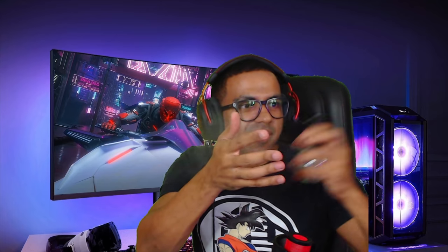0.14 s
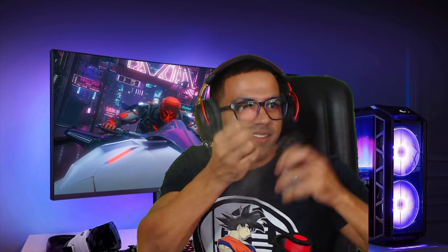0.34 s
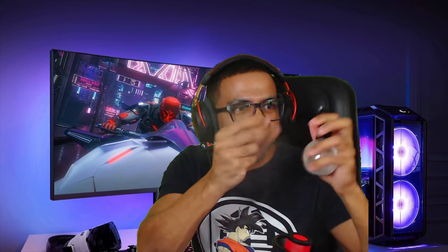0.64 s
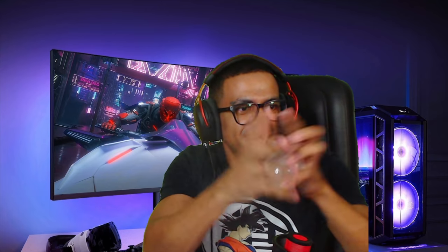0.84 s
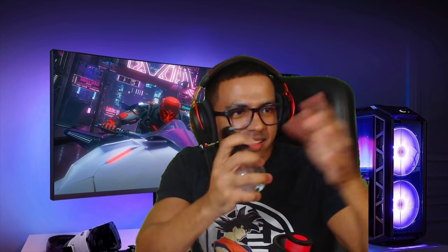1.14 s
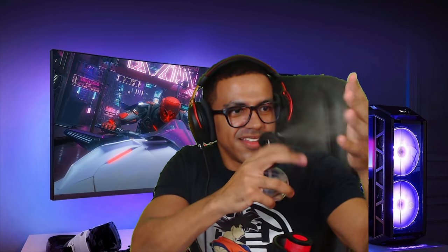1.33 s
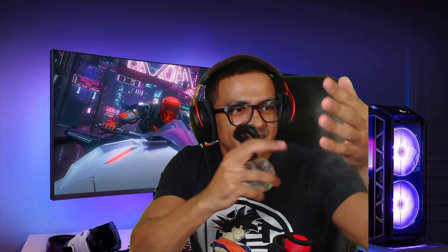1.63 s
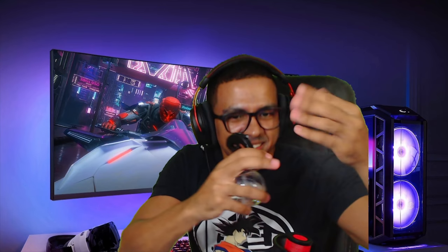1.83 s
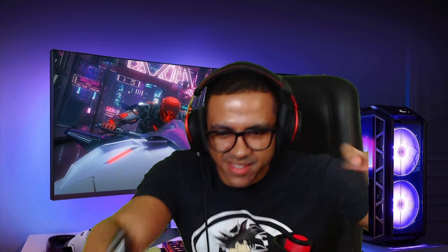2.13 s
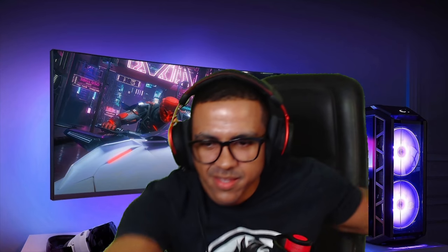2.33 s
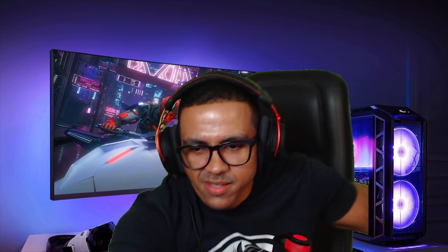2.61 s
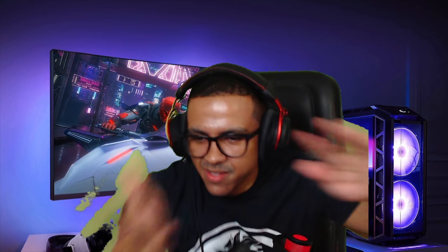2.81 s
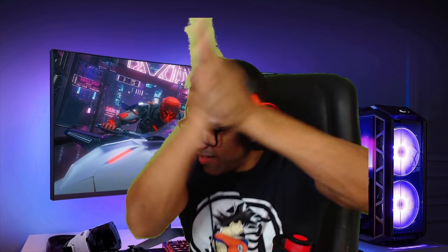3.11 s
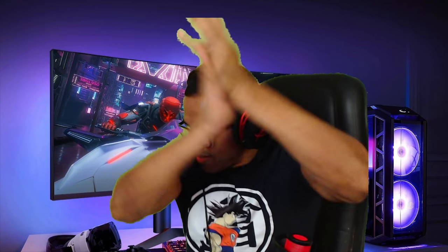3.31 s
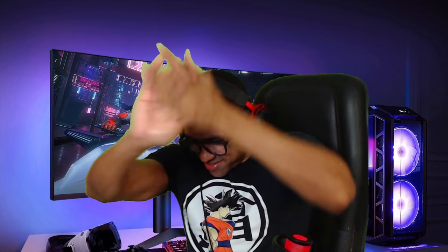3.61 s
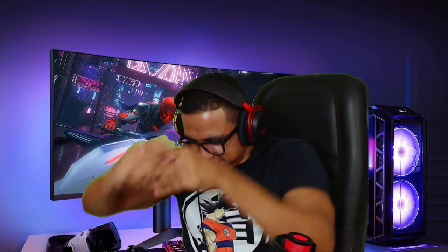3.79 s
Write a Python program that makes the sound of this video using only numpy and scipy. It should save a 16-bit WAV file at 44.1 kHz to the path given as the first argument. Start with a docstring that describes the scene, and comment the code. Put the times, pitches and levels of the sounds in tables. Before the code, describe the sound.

Spray bottle squirts and sharp plastic clicks come first, in two groups; after a short scrape the bottle lands hard on the desk, then hands clap lightly and rub in soft strokes, close microphone, small dry room.

```python
"""Pump bottle sprays and hand rub at a desk

Close by, a pump bottle sprays one hand three times and the other four (pressure-shaped hiss), its plunger clicking.
The bottle lands hard: damped desk modes boom, decaying noise rattles and shudders.
Palms meet and rub (stroke-shaped noise); arms and chair rumble faintly in a dry room."""
import sys
import numpy as np
from scipy import signal
from scipy.fft import rfft, irfft, next_fast_len
from scipy.io import wavfile
from scipy.ndimage import map_coordinates

SR = 44100
rng = np.random.default_rng(int(sys.argv[2]) if len(sys.argv) > 2 else 0)


def put_to_file(sound):
    """Save the sound as 16-bit audio at rate SR, in the file named by the first command-line argument."""
    columns = np.atleast_2d(sound).T  # one column per channel
    safe = np.clip(columns, -1, 1)
    whole_steps = np.round(safe * 32767)
    wavfile.write(sys.argv[1], SR, whole_steps.astype(np.int16))


N = 174195

# pump squirts: start_s, hold_s, level_db, treble_gain_db
SPRAYS = [(0.139, 0.12, -35, -4), (0.377, 0.1, -33.5, -2.3), (0.635, 0.1, -35, -1),
          (1.294, 0.11, -36, -5.5), (1.488, .108, -38, 2), (1.671, 0.081, -39, 2.5), (1.823, 0.08, -36, -3)]
# spray hiss spectrum: freq_hz, level_db
MIST_SPECTRUM = [(300, -46), (600, -36), (1000, -17.5), (1800, -18.5), (2500, -8), (3300, -6), (4600, -2),
                 (6000, -3.5), (7000, -5), (8200, 4.5), (9500, -0.5), (11000, -5), (13000, -11),
                 (15500, -17)]
SPRAY_START_DB, SPRAY_RISE_S, SPRAY_FALL_DB_PER_S = -6.5, 0.018, 425
SPRAY_TAIL_DB, SPRAY_TAIL_DB_PER_S = -10, 108
TREBLE_PRESSURE_EXPONENT = 1.71

# liquid spitting in the nozzle and under the fingers: start_s, end_s, level_db
SQUELCHES = [(0.148, .24, -38), (0.388, .51, -37), (0.641, 0.705, -35.5), (0.81, 0.953, -59),
             (1.019, 1.192, -45), (1.504, 1.55, -40), (1.675, 1.72, -36.5)]
DROPS_PER_S, DROP_HZ, DROP_LOG_SPREAD, DROP_T60_CYCLES = 130, 2480, 0.33, 16.7

# plunger and cap clicks: start_s, snap_db, knock_db, ring_hz (layer trims below add to the levels)
CLICKS = [(0.0353, -33.5, -34.5, 920), (0.0642, -34, -32, 2800), (.132, -30.5, -37.5, 3230),
          (0.1474, -36, -33, 2870), (0.2925, -35, -34, 1010), (.366, -31, -35, 3440),
          (.502, -32.5, -47, 4860), (0.5257, -34, -28.5, 1355), (.546, -34, -50, 1180),
          (.557, -39, -38.5, 1300), (0.6175, -34, -36, 4720), (.6376, -39, -34, 1710),
          (.771, -40, -51, 3820), (0.7845, -29, -33, 1023), (0.8043, -55, -49.5, 1390),
          (.82, -40.5, -52, 4800), (0.873, -42.5, -42, 1150), (.923, -40.5, -59, 3070),
          (1.004, -31, -36, 2320), (1.075, -47, -46.5, 1780), (1.118, -43, -57, 3000),
          (1.178, -44, -52, 2830), (1.3302, -42, -42, 1920), (1.443, -24.5, -35.5, 4460),
          (1.461, -32, -37.5, 1800), (1.482, -34, -49, 4100), (1.51, -36, -37, 934),
          (1.533, -27, -39, 4120), (1.6269, -23, -31, 4620), (1.6671, -22.5, -34.5, 4490),
          (1.6912, -35, -39.5, 990), (1.7846, -34, -35.5, 4870), (1.8192, -28, -35, 4750),
          (1.9414, -27.5, -34, 4600), (1.959, -41, -42, 2060), (1.969, -37.5, -47, 3820),
          (2.1211, -37.5, -64, 3020), (2.1605, -44.5, -58, 4350), (2.194, -61, -49, 3700)]
# hollow knock spectrum: freq_hz, level_db
KNOCK_SPECTRUM = [(200, -3), (550, -15), (950, 4), (1250, -11), (1900, -2), (2500, -2.5), (3500, -7),
                  (7000, -37)]
# plastic snap spectrum: freq_hz, level_db
SNAP_SPECTRUM = [(800, -56), (2200, -5), (3400, 2.5), (4700, 5.5), (6000, -2), (8200, 6.5), (9800, -4.5),
                 (11500, -19.5), (15500, -50)]
KNOCK_TRIM_DB, SNAP_TRIM_DB, RING_TRIM_DB = 1.5, 0.5, 4  # ring is relative to knock_db
CLICK_HOLD_S, KNOCK_T60_S, SNAP_T60_S, RING_T60_S = 0.0015, 0.019, 0.014, 0.016

# fingers shifting on the bottle: middle_s, half_length_s, level_db, top_hiss_db
GRIPS = [(.01, 0.012, -49, -50), (.07, 0.031, -55, -63), (.56, 0.062, -60, -58), (.83, 0.061, -53.5, -53),
         (.93, 0.052, -58, -57.5), (1.085, 0.03, -51, -53), (1.16, 0.035, -56.5, -55),
         (1.98, 0.036, -57.5, -61), (2.06, 0.018, -69.5, -61), (2.145, 0.026, -55.5, -67),
         (2.26, 0.088, -58, -68), (2.445, 0.017, -58.5, -65)]
# finger friction spectrum: freq_hz, level_db
GRIP_SPECTRUM = [(300, -20), (900, -16.5), (2000, 0), (4500, 0.5), (6000, -6), (9000, -26), (15500, -47.5)]
# dry top hiss spectrum: freq_hz, level_db
GRIP_TOP_SPECTRUM = [(3000, -28), (6000, -8), (8500, 7), (10500, -10), (15500, -24.5)]
# palm strokes: middle_s, half_length_s, level_db, catch_db
STROKES = [(3.106, 0.019, -46.5, -65), (3.211, 0.023, -53.5, -54.5), (3.264, 0.021, -49.5, -52),
           (3.378, 0.022, -43, -49), (3.489, 0.028, -47, -78), (3.636, 0.038, -52.5, -59),
           (3.716, 0.043, -53, -71), (3.925, 0.011, -50.5, -57.5), (3.948, 0.0045, -35, -44)]
# skin hiss spectrum: freq_hz, level_db
SKIN_SPECTRUM = [(300, -17), (900, -2.5), (1600, -24), (2800, -5), (4500, 3.5), (6500, -1), (8500, 2.5),
                 (11000, -6), (15500, -23)]
# skin catching spectrum: freq_hz, level_db
CATCH_SPECTRUM = [(500, -23), (1300, -10), (2000, -3.5), (3000, 2), (4500, -6), (8000, -18), (15500, -35)]
GRIP_ROUGH_DB, SKIN_ROUGH_DB, CATCH_ROUGH_DB = 5, 1.5, 5.5
# palms meeting: start_s, level_db
CLAPS = [(3.064, -46.5), (3.074, -26.5)]
# palm contact spectrum: freq_hz, level_db
CLAP_SPECTRUM = [(200, -5), (480, 5.5), (800, -8.5), (1300, -5), (1800, 5.5), (2600, -4.5), (4000, -6),
                 (6500, -9.5), (8500, -6.5), (11000, -17), (15500, -37.5)]
CLAP_HOLD_S, CLAP_T60_S = 0.0044, 0.024

# scrape spectrum: freq_hz, level_db
SLIDE_SPECTRUM = [(290, -24), (500, -7), (949, -25), (1720, -6.5), (2020, -15), (3090, -3), (4800, -5.5),
                  (8490, -20), (15000, -59)]
SLIDE_S, SLIDE_END_S, SLIDE_DB = 2.52, 2.605, -40.5

# bottle contacts with the desk: start_s, boom_db, clack_db, softness_corner_hz
BLOWS = [(2.607, -28, -14, 1200), (2.615, -10.5, -17.5, 900), (2.623, -27, -21, 900),
         (2.638, -13.5, -29, 650), (2.657, -13, -34, 258), (2.703, -23, -46.5, 350), (2.79, -35, -43, 600),
         (2.849, -43, -46.5, 618)]
# desk modes: freq_hz, level_db, t60_s
DESK_MODES = [(62.4, -27, 0.35), (169, -18, .13), (206, 2.5, 0.15), (269.5, -1.5, 0.099), (314, -7, 0.076),
              (327, -8, .07), (417, -5, 0.055), (441.3, -3, 0.11), (507.4, -5.5, .09), (556, -11, 0.25),
              (613, -10, 0.083), (700, -13, 0.077), (862, -19, 0.12)]
# clack spectrum: freq_hz, level_db
CLACK_SPECTRUM = [(40, -28), (150, -5), (500, 5.5), (900, -3), (1400, -14.5), (1800, -9.5), (2150, 4),
                  (2480, -2), (2900, -13), (4500, -14.5), (7000, -16.5), (9000, -18), (15500, -42)]
CLACK_HOLD_S, CLACK_T60_S = 0.0017, 0.05
# loose things rattling, spectrum: freq_hz, level_db
RATTLE_SPECTRUM = [(400, 7.5), (1200, 0.5), (2400, 3), (4500, 0), (8000, -7), (11000, -21), (15500, -36.5)]
RATTLE_DB, RATTLE_DB_PER_S = -30.5, 81
RATTLE_HOLD_S, RATTLE_EXTRA_DB_PER_S = 0.13, 114.5  # steeper fall after the hold
# desk shudder spectrum: freq_hz, level_db
SHUDDER_SPECTRUM = [(90, -30), (160, -9), (210, 5.5), (255, 1), (330, -11), (490, -7.5), (570, -8.5),
                    (680, -24.5), (850, -20.5), (1300, -43), (3000, -70)]
SHUDDER_DB, SHUDDER_DB_PER_S = -28, 45

# rumble of moving arms and chair: time_s, level_db
MOVING = [(0, -53), (.5, -49), (.9, -50.5), (1.13, -44.5), (1.26, -57.5), (1.45, -46.5), (1.75, -50),
          (2.1, -48.5), (2.3, -46), (2.6, -44), (3.15, -45), (3.25, -47), (3.5, -48.5), (3.95, -50)]
# rumble spectrum: freq_hz, level_db
RUMBLE_SPECTRUM = [(20, -28), (40, -3), (62, 10), (85, 2.5), (150, 7), (200, 1), (270, -10.5), (400, -20.5),
                   (800, -26), (2000, -54.5)]
RUMBLE_SWING_DB = 2.5
# soft bumps of hands and elbows; the rows at 2.8 and 2.855 s are the bottle rocking on the desk: start_s,
# pitch_hz, level_db, t60_s
BUMPS = [(1.006, 83, -12.5, 0.037), (1.096, 66, -33, 0.15), (1.44, 137, -26.5, 0.071),
         (1.497, 121, -27.5, 0.069), (1.688, 105, -24, 0.05), (2.026, 62.6, -32.5, .13),
         (2.48, 173, -30, 0.093), (2.8, 243, -24, 0.065), (2.855, 217, -32, 0.55), (2.925, 245, -35.5, .2),
         (2.969, 68, -35, 0.74), (3.073, 148, -28.5, 0.15), (3.302, 185.6, -26.5, 0.092),
         (3.308, 305, -33, 0.067), (3.556, 169, -32, .13), (3.579, 175, -34, 0.12)]
BUMP_RISE_S = 0.0028
# chair creak: middle_s, pitch_hz, level_db, half_length_s
CREAKS = [(3.813, 444, -54.5, 0.07)]

# steady background spectrum: freq_hz, level_db
FLOOR_SPECTRUM = [(100, 11), (500, 3), (1500, 3), (4000, -9), (9000, -41), (15500, -42)]
FLOOR_DB = -61
# room decay: freq_hz, t60_s
ROOM_DECAY = [(100, 0.2), (1000, 0.32), (5000, 0.15), (14000, .12)]
ROOM_DB = -14.5

# all-pass corners of the side signal: corner_hz
SIDE_TURNS_HZ = (60, 250, 900)
SIDE_DB, SIDE_DELAY_S = -17, 0.00044
LOW_CUT_HZ, TOP_HZ = 32, 15850


def amp(db):
    """Decibels to gain."""
    return 10 ** (np.asarray(db) / 20)


def unit(x):
    """Scale to rms 1."""
    return x / np.sqrt(np.mean(x ** 2) + 1e-20)


def along(points, hz):
    """Interpolate (freq_hz, value) points on a log frequency axis."""
    point_hz, values = np.transpose(points)
    return np.interp(np.log(hz + 1), np.log(point_hz + 1), values)


def clock():
    """Time of every sample, s."""
    return np.arange(N) / SR


def filtered(x, response):
    """Apply a frequency response by zero-padded FFT."""
    size = next_fast_len(N + 8192)
    return irfft(rfft(x, size) * response(np.fft.rfftfreq(size, 1 / SR)), size)[..., :N]


def noise(spectrum):
    """Coloured Gaussian noise of rms 1."""
    return unit(filtered(rng.standard_normal(N), lambda hz: amp(along(spectrum, hz))))


def wobble(knots_per_s):
    """Smooth curve through random normal knots."""
    knots = rng.standard_normal(int(N * knots_per_s / SR) + 4)
    return map_coordinates(knots, [np.arange(N) * knots_per_s / SR])


def add(out, start_s, x):
    """Mix x into out at start_s."""
    part = out[max(round(start_s * SR), 0):][:len(x)]
    part += x[:len(part)]


def bursts(rows, spectrum, hold_s, t60_s):
    """Short contacts (start_s, level_db): coloured noise held briefly, then decaying fast."""
    out, source, t = np.zeros(N), noise(spectrum), np.arange(4096) / SR
    shape = amp(-60 * np.maximum(t - hold_s, 0) / t60_s) * (1 - np.exp(-t / 0.0006))
    for k, (start_s, db) in enumerate(rows):
        burst = source[k * len(t):][:len(t)] * shape
        equal_energy = np.linalg.norm(shape) / np.linalg.norm(burst)
        add(out, start_s, amp(db) * burst * equal_energy)
    return out


def damped_tones(rows, rise_s, length):
    """Exponentially damped sines (start_s, pitch_hz, level_db, t60_s)."""
    out, t = np.zeros(N), np.arange(length) / SR
    for start_s, hz, db, t60_s in rows:
        decay = amp(db - 60 * t / t60_s)
        add(out, start_s, decay * np.sin(2 * np.pi * hz * t) * (1 - np.exp(-t / rise_s)))
    return out


def pings(rows):
    """Brief damped rings with a sharp onset."""
    return damped_tones(rows, 0.00028, 2048)


def sprays():
    """Pressure builds, holds and collapses; the hiss grows louder and brighter with it."""
    out, t = np.zeros(N), np.arange(SR // 2) / SR
    mist = noise(MIST_SPECTRUM)
    top = filtered(mist, lambda hz: 1 / (1 + (6000 / (hz + 1)) ** 4))
    body = mist - top
    for start_s, hold_s, db, treble_db in SPRAYS:
        late = np.maximum(t - hold_s, 0)
        push = amp(SPRAY_START_DB * np.exp(-t / SPRAY_RISE_S) - SPRAY_FALL_DB_PER_S * late)
        tail = amp(SPRAY_TAIL_DB - SPRAY_TAIL_DB_PER_S * late)
        pressure = np.maximum(push, tail) * (1 - np.exp(-t / 0.009))
        i = round(start_s * SR) + np.arange(len(t))
        bright = amp(treble_db) * top[i] * pressure ** TREBLE_PRESSURE_EXPONENT
        add(out, start_s, amp(db) * (body[i] * pressure + bright))
    return out * amp(1.1 * wobble(120))


def squelches(count=40):
    """Tiny bubbles ring at random pitches, shorter the higher."""
    drops = []
    for start_s, end_s, db in SQUELCHES:
        times = start_s + (np.arange(count) + rng.uniform(-0.86, 1, count)) / DROPS_PER_S
        pitches = DROP_HZ * np.exp(DROP_LOG_SPREAD * rng.standard_normal(count))
        levels = db + 4 * rng.standard_normal(count)
        for s, hz, level in zip(times, pitches, levels):
            if s < end_s:
                drops.append((s, hz, level, DROP_T60_CYCLES / hz))
    return pings(drops)


def clicks():
    """The plunger hits its stops: a hollow knock, a plastic snap and a ring that changes with the grip."""
    knock_rows = [(s, db + KNOCK_TRIM_DB) for s, _, db, _ in CLICKS]
    snap_rows = [(s, db + SNAP_TRIM_DB) for s, db, _, _ in CLICKS]
    rings = pings([(s, hz, db + RING_TRIM_DB, RING_T60_S) for s, _, db, hz in CLICKS])
    knocks = bursts(knock_rows, KNOCK_SPECTRUM, CLICK_HOLD_S, KNOCK_T60_S)
    snaps = bursts(snap_rows, SNAP_SPECTRUM, CLICK_HOLD_S, SNAP_T60_S)
    return knocks + snaps + rings


def friction(rows, spectrum, rough_db):
    """Sliding skin: noise swells and fades with stroke speed, with a fine grain."""
    t = clock()
    power = sum(amp(2 * db) / (1 + ((t - s) / half_s) ** 2 / 5) ** 6 for s, half_s, db in rows)
    grain = amp(rough_db * wobble(760) + rough_db / 2 * wobble(90))
    return np.sqrt(power) * unit(noise(spectrum) * grain)


def rubbing(rows, first, second, first_rough_db, second_rough_db):
    """Two friction layers on the same strokes, each at its own level."""
    first_rows = [(s, half_s, db) for s, half_s, db, _ in rows]
    second_rows = [(s, half_s, db) for s, half_s, _, db in rows]
    return friction(first_rows, first, first_rough_db) + friction(second_rows, second, second_rough_db)


def hands():
    """Fingers shift on the bottle; later the palms meet and rub, hissing and catching."""
    fingers = rubbing(GRIPS, GRIP_SPECTRUM, GRIP_TOP_SPECTRUM, GRIP_ROUGH_DB, GRIP_ROUGH_DB)
    palms = rubbing(STROKES, SKIN_SPECTRUM, CATCH_SPECTRUM, SKIN_ROUGH_DB, CATCH_ROUGH_DB)
    return fingers + palms + bursts(CLAPS, CLAP_SPECTRUM, CLAP_HOLD_S, CLAP_T60_S)


def slide():
    """An even noise scrape that fades out as the bottle lands."""
    corners_s = [SLIDE_S - 0.004, SLIDE_S + 0.01, SLIDE_END_S, SLIDE_END_S + 0.018]
    return amp(SLIDE_DB) * noise(SLIDE_SPECTRUM) * np.interp(clock(), corners_s, [0, 1, 1, 0])


def desk_boom():
    """Each contact rings the desk modes; a soft contact excites the high modes less."""
    out, t = np.zeros(N), np.arange(SR) / SR
    for start_s, db, _, corner_hz in BLOWS:
        ring = np.zeros(len(t))
        for hz, level_db, t60_s in DESK_MODES:
            decay = amp(level_db + rng.normal(0, 1) - 60 * t / t60_s)
            ring += decay * np.sin(2 * np.pi * hz * t) / np.hypot(1, (hz / corner_hz) ** 2)
        add(out, start_s, amp(db) * ring * (1 - np.exp(-t / 0.0021)))
    return out


def rattle_and_shudder():
    """From the first contact, an uneven rattle and a low shudder die away as noise."""
    age = np.maximum(clock() - BLOWS[0][0], 0)
    rattle_db = RATTLE_DB - RATTLE_DB_PER_S * age + 3.1 * wobble(200)
    rattle_db -= RATTLE_EXTRA_DB_PER_S * np.maximum(age - RATTLE_HOLD_S, 0)
    rattle = noise(RATTLE_SPECTRUM) * amp(rattle_db)
    shudder = noise(SHUDDER_SPECTRUM) * amp(SHUDDER_DB - SHUDDER_DB_PER_S * age)
    return (1 - np.exp(-age / 0.0059)) * (rattle + shudder)


def desk():
    """The bottle clacks down and rocks; the desk booms, shudders and rattles."""
    clack = bursts([(s, db) for s, _, db, _ in BLOWS], CLACK_SPECTRUM, CLACK_HOLD_S, CLACK_T60_S)
    return desk_boom() + clack + rattle_and_shudder()


def movement():
    """Arms and chair rumble unevenly through the desk, with soft damped bumps."""
    level_db = np.interp(clock(), *np.transpose(MOVING)) + RUMBLE_SWING_DB * wobble(24.92)
    return noise(RUMBLE_SPECTRUM) * amp(level_db) + damped_tones(BUMPS, BUMP_RISE_S, SR // 2)


def creak():
    """The chair gives a soft tone of unsteady pitch as the weight shifts."""
    out, t = np.zeros(N), clock()
    for middle_s, hz, db, half_s in CREAKS:
        phase = 2 * np.pi * np.cumsum(hz * (1 + 0.0704 * wobble(120))) / SR
        out += amp(db - 4.4 * ((t - middle_s) / half_s) ** 2) * np.sin(phase)
    return out


def room(x):
    """A short diffuse tail: noise whose decay time depends on frequency."""
    hz, t, bins = signal.stft(rng.standard_normal(SR // 3), SR, nperseg=256)
    decay = amp(-60 * t / along(ROOM_DECAY, hz)[:, None])
    tail = signal.istft(bins * decay, SR, nperseg=256)[1]
    delayed = np.pad(x, (200, 0))  # samples
    return signal.fftconvolve(delayed, tail / np.linalg.norm(tail))[:N]


def background():
    """Steady coloured noise."""
    return amp(FLOOR_DB) * noise(FLOOR_SPECTRUM)


def scene():
    """Near sounds with their room tail, over movement, creak and background; two equal channels."""
    near = sprays() + squelches() + clicks() + hands() + slide() + desk()
    mono = near + amp(ROOM_DB) * room(near) + movement() + creak() + background()
    return np.array([mono, mono])


def record(dry):
    """Widen with a weak delayed, phase-turned side signal; cut the deepest bass and all above TOP_HZ."""
    def turn(hz):
        """Delay and first-order all-passes."""
        turns = [(1j * hz - c) / (1j * hz + c) for c in SIDE_TURNS_HZ]
        return np.exp(-2j * np.pi * hz * SIDE_DELAY_S) * np.prod(turns, axis=0)

    side = amp(SIDE_DB) * filtered(dry[0], turn)
    low_cut = signal.butter(2, LOW_CUT_HZ, "highpass", fs=SR, output="sos")
    wide = signal.sosfilt(low_cut, dry + np.array([side, -side]))
    return filtered(wide, lambda hz: hz < TOP_HZ)


dry = scene()
out = record(dry)
put_to_file(out)
```